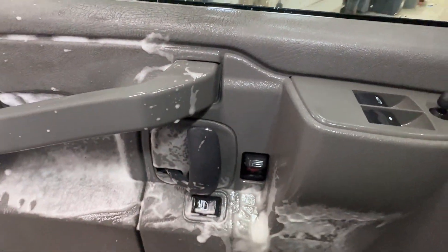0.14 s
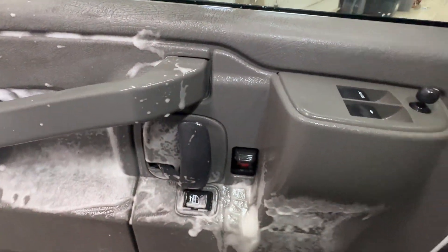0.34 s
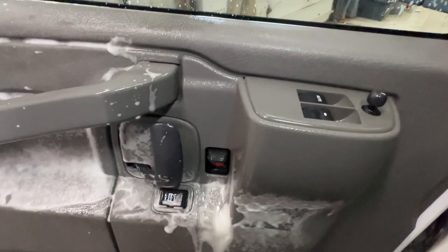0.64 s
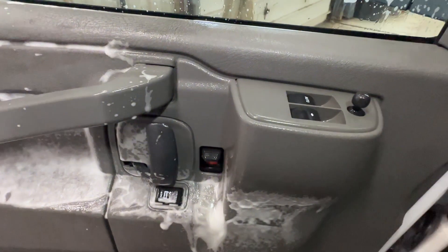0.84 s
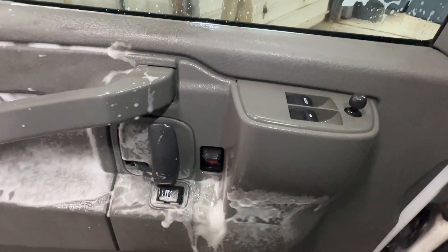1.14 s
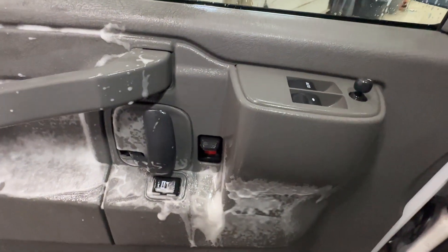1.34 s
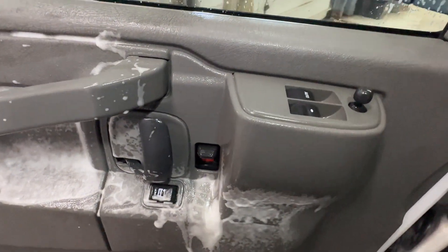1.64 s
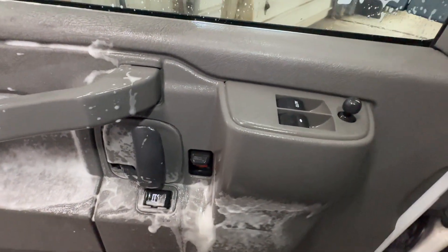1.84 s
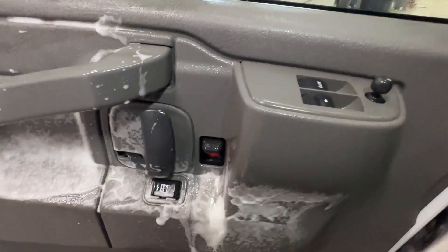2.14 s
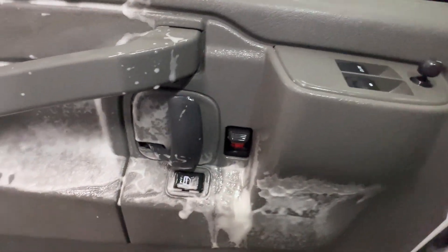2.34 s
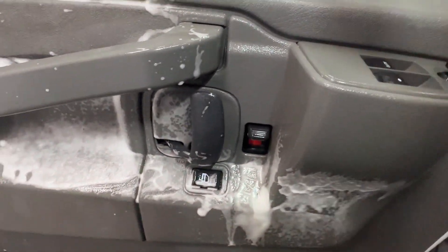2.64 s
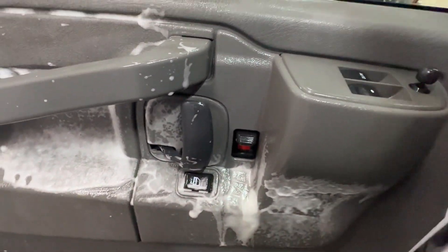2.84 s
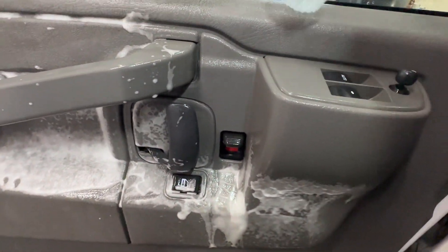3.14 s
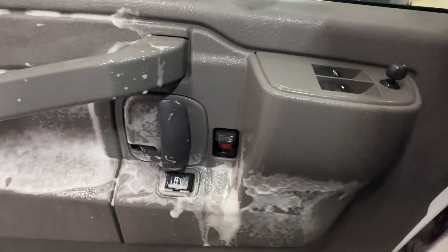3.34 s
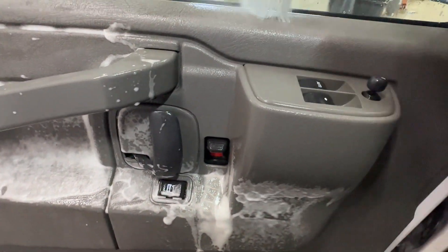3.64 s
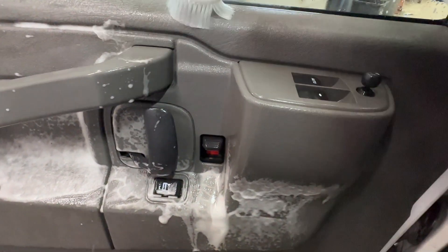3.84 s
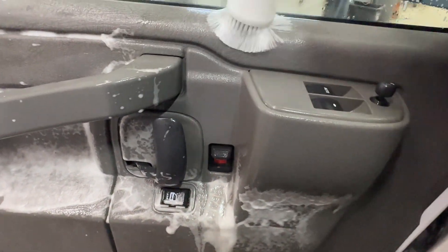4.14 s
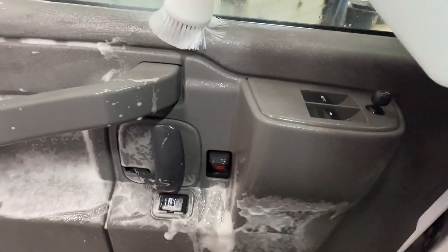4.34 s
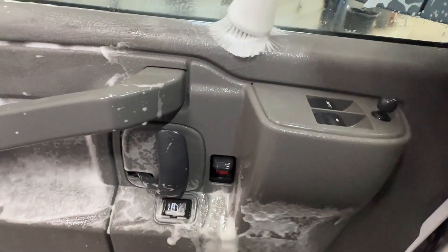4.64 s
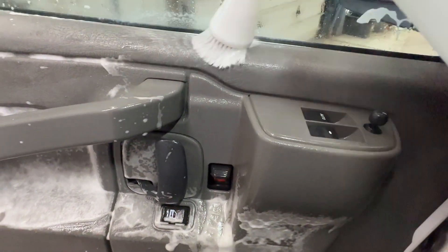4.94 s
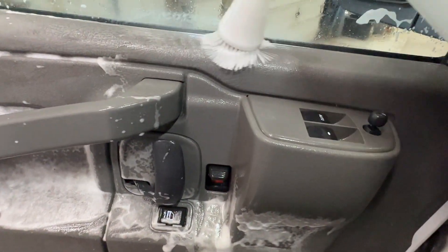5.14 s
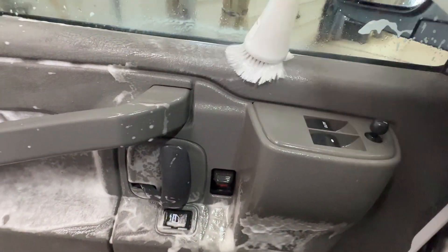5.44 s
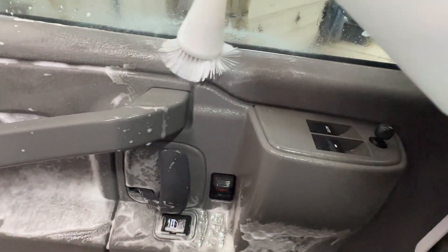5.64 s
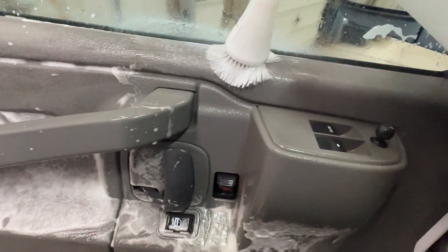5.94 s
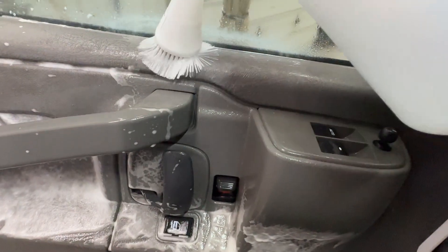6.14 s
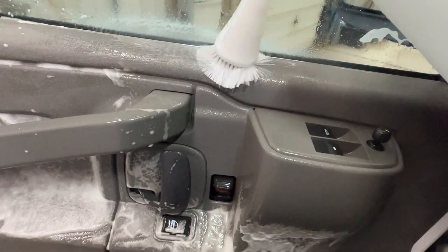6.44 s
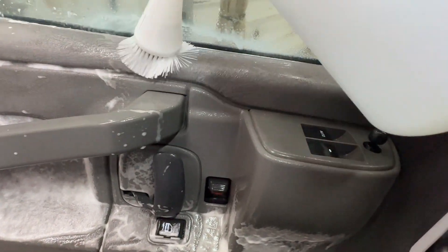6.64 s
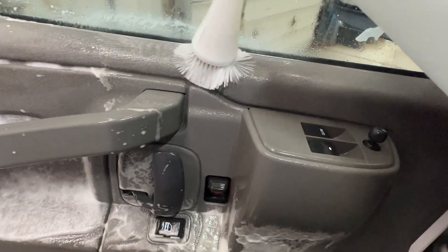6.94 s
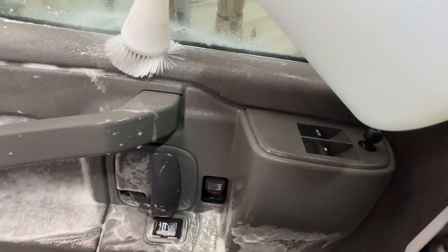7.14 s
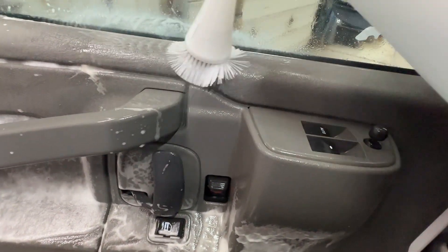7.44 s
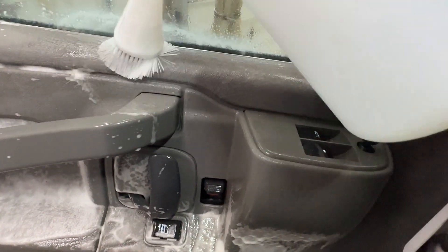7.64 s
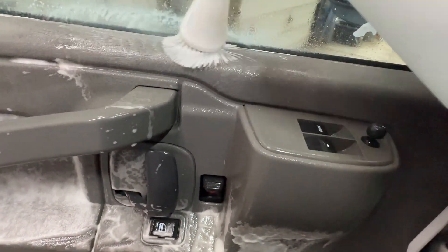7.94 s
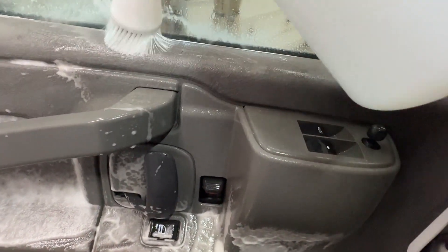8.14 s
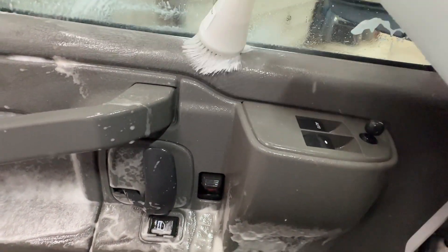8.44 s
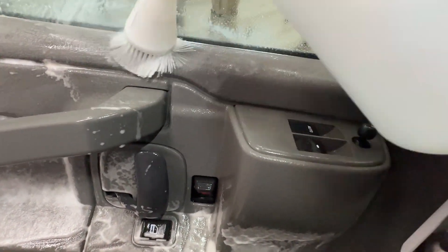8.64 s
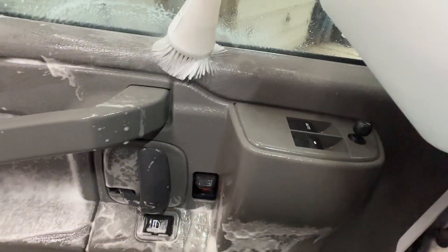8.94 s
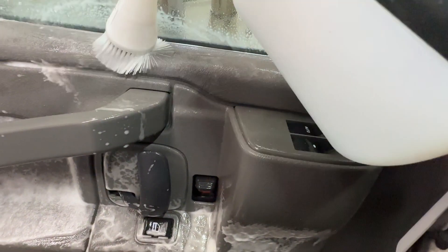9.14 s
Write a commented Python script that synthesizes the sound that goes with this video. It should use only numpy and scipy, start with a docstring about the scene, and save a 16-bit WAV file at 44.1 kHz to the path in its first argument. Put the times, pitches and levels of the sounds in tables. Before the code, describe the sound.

Close steam hiss with gliding hollow tones and small knocks, windy gusts and a thump, then a fast, buzzing, wet spray through bristles on plastic.

```python
"""A steam cleaner hisses inside an open car door, close to a two-port microphone: filtered noise in three
parts (roar, rush and hiss), with hollow rings that glide and fade. A low draught and a few knocks join in.
The free jet swings nearer, gusts of noise and a thump buffet the microphone, and the level dips briefly.
Then the round brush meets the wet plastic panel and scrubs to and fro: the noise sputters
about 62 times a second through the bristles, with ticking droplets and a faint hum."""
import sys
import numpy as np
from scipy import signal
from scipy.fft import rfft, irfft
from scipy.io import wavfile
from scipy.ndimage import uniform_filter1d, map_coordinates

SR = 44100
rng = np.random.default_rng(int(sys.argv[2]) if len(sys.argv) > 2 else 0)


def dump(signal):
    """Clip the signal to [-1, 1] and save it as 16-bit WAV at the path in sys.argv[1]."""
    limited = np.clip(np.atleast_2d(signal).T, -1, 1)
    pcm = np.round(limited * 32767).astype(np.int16)
    wavfile.write(sys.argv[1], SR, pcm)


N = 409248
T = np.arange(N) / SR  # time of each sample, s
HZ = np.fft.rfftfreq(N, 1 / SR)
SWITCH_S = 3.309  # the brush meets the panel


def gain_of(db):
    """Turns decibels into a gain."""
    return 10 ** (np.asarray(db) / 20)


def evened(x):
    """Scales to rms 1."""
    return x / np.sqrt(np.mean(x ** 2) + 1e-20)


def read(points, hz):
    """Reads a curve over frequency, with straight lines on a log-frequency axis."""
    f, value = np.transpose(points)
    return np.interp(np.log(hz + 1), np.log(f), value)


def follow(rows):
    """Gives each column of a curve over time at every sample."""
    s, *columns = np.transpose(rows)
    return [np.interp(T, s, column) for column in columns]


def shaped(x, gain):
    """Filters by a gain for each frequency."""
    return irfft(rfft(x) * gain, N)


def band_rms(x, lo, hi):
    """Measures the level of a sound within a band."""
    return shaped(x, (HZ > lo) & (HZ < hi)).std()


def waver(rate_hz):
    """Random wandering of rms 1, mostly slower than the given rate."""
    return evened(shaped(rng.standard_normal(N), 1 / (1 + (HZ / rate_hz) ** 2)))


def gate(start, end, edge_s):
    """1 between two moments, with sloping edges."""
    return np.clip(np.minimum(T - start, end - T) / edge_s + .5, 0, 1)


def pair(same, phase):
    """White turbulence at two ports: partly the same noise, with the left port ahead by a phase."""
    a, b = rfft(rng.standard_normal((2, N)))
    same = np.clip(same, 0, 1)
    right = (same * a + np.sqrt(1 - same ** 2) * b) * np.exp(-1j * phase)
    return irfft(np.array([a, right]), N)


def echoed(x, lag_ms, strength, dull_hz=6000):
    """A near surface throws back a dull, inverted copy, which combs the sound as the lag changes."""
    late = T - lag_ms / 1000
    dull = shaped(x, 1 / (1 + (HZ / dull_hz) ** 4))
    return x - strength * np.array([np.interp(late, T, side) for side in dull])


def lagged(x, lag_ms):
    """Delays a sound by a changing amount."""
    return map_coordinates(x, [(T - lag_ms / 1000) * SR], order=3, mode="nearest")


def swept(x, lag_ms):
    """As the source moves sideways, it reaches the left port later or sooner."""
    return np.array([lagged(x[0], lag_ms), x[1]])


def patches(shape, size=(7, 12)):
    """Random patches of rms 1 that swell and fade, smoothed over size (bins, frames)."""
    across_bins = uniform_filter1d(rng.standard_normal(shape), size[0], axis=-2)
    return evened(uniform_filter1d(across_bins, size[1], axis=-1))


# strength at which each jet's parts have their listed levels
USUAL_DB = -20


def part_levels(strength_db, parts):
    """Roar, rush and hiss each follow the jet's strength by their own amount."""
    return [db + slope * (strength_db - USUAL_DB) for db, slope in parts]


# the microphone housing sets the lead of the left port in the treble: f/Hz, phase/rad
HOUSING_PHASE = [(7700, 0), (8400, -1.8), (9100, -3.0), (9650, -3.1), (10400, 0), (11800, 0), (12250, .8),
                 (12600, 3), (13700, 3.1), (14100, .3), (14500, 0)]
# balance of the jets between the ports: f/Hz, left minus right level/dB
BALANCE_DB = [(300, -2.5), (700, -1), (1300, -3.5), (2400, .5), (4400, 0.5), (8100, -2), (11000, 0.5)]
# likeness of the two ports; the rest is scatter: f/Hz, share 0-1
LIKENESS = [(60, .92), (520, .88), (750, .68), (1500, .72), (2200, .4), (3400, .22), (4500, .26),
            (5900, .18), (7000, .3), (8300, .7), (9300, .96), (10000, .72), (10700, .96), (12300, .82),
            (13000, .98), (15000, .96)]
DIRECT_LIKENESS = 0.98


def steam(colour, phase, peaks, direct_patchy_db, scatter_patchy_db, aimed):
    """Jet noise as roar, rush and hiss, each of level 1: ringing direct sound plus scatter off the door."""
    lead = np.where(HZ < HOUSING_PHASE[0][0], read(phase, HZ), read(HOUSING_PHASE, HZ))
    half_balance = np.array([[.5], [-.5]]) * read(BALANCE_DB, HZ)
    tint = gain_of(read(colour, HZ) + half_balance)
    sources = shaped(np.array([pair(DIRECT_LIKENESS, lead), pair(0, 0)]), tint)
    hz, t, (direct, scatter) = signal.stft(sources, SR, nperseg=1024)
    ring_db = 0
    for centre, width, db in peaks:
        offset = 2 * (hz[:, None] - np.interp(t, T, centre)) / width
        ring_db = ring_db + np.interp(t, T, db) / (1 + offset ** 2)
    # the straighter the aim, the less scatter
    scattered = (1 - read(LIKENESS, hz)[:, None]) * np.clip(1 - np.interp(t, T, aimed), 0, 1)
    direct = direct * np.sqrt(1 - scattered) * gain_of(ring_db + direct_patchy_db * patches(ring_db.shape))
    scatter = scatter * np.sqrt(scattered) * gain_of(scatter_patchy_db * patches(scatter.shape))
    noise = signal.istft(direct + scatter, nperseg=1024)[1][:, :N]
    bands = [(700, 1800), (1800, 7500), (7500, 16000)]  # where each part's level is set, Hz
    low, high = (1 / (1 + (HZ / split_hz) ** 8) for split_hz in bands[1])
    shares = [low, high - low, 1 - high]
    return [shaped(noise, share) / band_rms(noise, *band) for share, band in zip(shares, bands)]


# hollow rings and breathy whistles that come and go as the wand moves:
# start t/s, end t/s, from f/Hz, to f/Hz, level/dB
RINGS = [(-0.1, 1.05, 2490, 2330, 6.5), (-0.1, 1.2, 5170, 5540, 10), (0.55, 1.1, 3220, 3120, 7),
         (0.55, 1.25, 6300, 6280, 6), (1.35, 2.06, 2920, 2960, 7), (1.36, 1.72, 3680, 3600, 2),
         (1.4, 2.05, 6150, 6480, 8), (1.4, 1.8, 5600, 5500, 7), (1.55, 1.85, 2200, 2200, 4.5),
         (1.75, 2.4, 680, 600, 5), (2.18, 2.548, 3080, 2600, 6.5), (2.25, 2.7, 6070, 5950, 4.5),
         (2.44, 2.9, 5450, 4950, 3), (2.55, 2.93, 980, 880, 4), (2.58, 2.932, 2450, 2230, 6.5),
         (3.12, 3.32, 2900, 3200, 2), (4.3, 4.48, 5015, 4950, 8), (4.93, 5.25, 3045, 3000, 2),
         (7.7, 7.896, 5120, 5100, -1), (7.8, 8.45, 2600, 2650, 3), (8.86, 9.05, 5200, 5190, 0)]
RING_WIDTH_HZ, RING_EDGE_S = 370, 0.17


def rings():
    """Each ring glides and fades in and out: (Hz curve, width, dB curve)."""
    curves = []
    for start, end, from_hz, to_hz, db in RINGS:
        glide = np.interp(T, [start, end], [from_hz, to_hz])
        curves.append((glide, RING_WIDTH_HZ, db * gate(start, end, RING_EDGE_S)))
    return curves


# DIP_DB is the depth before the recovery eats into it
DIP_S, DIP_FALL_S, DIP_DB, DIP_RECOVERY_DB_PER_S = 3.1, 0.029, -16.5, 33


def dip():
    """The level falls quickly between the gusts and creeps back, in dB."""
    age = np.maximum(T - DIP_S, 0)
    return np.minimum(age / DIP_FALL_S, 1) * np.minimum(DIP_DB + DIP_RECOVERY_DB_PER_S * age, 0)


# tone of the free jet: f/Hz, relative level/dB per Hz
OPEN_COLOUR = [(200, -17), (350, -13.5), (490, -15), (640, -10), (850, -9.5), (1100, -7.5), (1800, -5),
               (2400, -4), (3500, -2), (5600, 1.5), (6600, 1), (7900, -2), (9200, -1.5), (10600, -7.5),
               (12300, -7.5), (15300, -1.5)]
# lead of the left port: f/Hz, phase/rad
OPEN_PHASE = [(100, -1), (400, -1.2), (800, -1.68), (1200, -2.5), (1680, -3), (2000, -4.5), (2400, -6.5),
              (3000, -7.5), (3300, -8.5), (3650, -9.5), (4400, -11), (4900, -14), (5450, -15), (6200, -19),
              (7000, -21), (7700, -28)]
# strength as the wand swings about and comes nearer: t/s, level/dB
SWING = [(0.0, -25), (0.16, -24.5), (0.48, -21), (0.88, -20.5), (1.28, -23), (1.4, -18.5), (1.52, -20.5),
         (1.68, -16.5), (1.84, -21), (1.96, -16.5), (2.08, -21), (2.8, -13.5), (2.95, -13.5)]
# roar, rush and hiss, one row each: level/dB at the usual strength, dB gained per dB of strength
OPEN_PARTS = [(-35, 0.84), (-24.5, 1.0), (-24.5, 0.6)]
# how straight the jet points at the microphone: t/s, share 0-1
AIM = [(0, 0.07), (1.3, 0.3), (1.55, 0.28), (2.1, 0.17), (2.36, 0.35), (2.43, 0.77), (2.65, 0.64),
       (2.86, 0.7), (2.96, 0), (3.2, .1)]
# the wand sweeps across the ports: t/s, extra lag of the left port/ms
SWEEP = [(0, -0.0033), (1.15, 0.0012), (1.55, -0.0018), (2.05, -0.053), (2.33, 0.014), (2.45, 0.006),
         (2.62, 0.015), (2.85, 0.055), (3.15, 0.036)]
# the jet roars more as it turns towards the microphone
TURN_S, TURN_LENGTH_S, TURN_ROAR_DB = 2.46, 0.58, 3.5
# a gust adds roar and covers rush and hiss
GUST_ROAR_DB, GUST_RUSH_DB, GUST_HISS_DB = 5, -1.5, -5
DIP_ROAR_SHARE, DIP_HISS_SHARE = 0.93, 0.94
DOOR_ECHO_MS, DOOR_ECHO_STRENGTH = 0.6, 0.12  # strength when aimed straight


def open_jet(hiss_rise_db_per_s=0.25, flutter_db=0.72, roar_flutter_db=-0.35, gust_edge_s=0.02):
    """Smooth hiss with breathy, shifting rings; its echo and its sweep across the ports make it phasey."""
    roar_db, rush_db, hiss_db = part_levels(follow(SWING)[0], OPEN_PARTS)
    facing = np.clip((T - TURN_S) / TURN_LENGTH_S, 0, 1)
    blown = gate(GUSTS[0][0], GUSTS[1][1], gust_edge_s)  # spans the first two gusts
    roar_db = roar_db + TURN_ROAR_DB * facing + GUST_ROAR_DB * blown
    roar_db = roar_db + roar_flutter_db * waver(50) + DIP_ROAR_SHARE * dip()
    rush_db = rush_db + GUST_RUSH_DB * blown + dip()
    hiss_db = hiss_db + hiss_rise_db_per_s * T + GUST_HISS_DB * blown + DIP_HISS_SHARE * dip()
    aimed, = follow(AIM)
    roar, rush, hiss = steam(OPEN_COLOUR, OPEN_PHASE, rings(), direct_patchy_db=2.8,
                             scatter_patchy_db=2.5, aimed=aimed)
    body = gain_of(rush_db) * rush + gain_of(roar_db) * roar
    body = echoed(body, DOOR_ECHO_MS, DOOR_ECHO_STRENGTH * aimed)
    body = swept(body, follow(SWEEP)[0])
    return (body + gain_of(hiss_db) * hiss) * gain_of(flutter_db * waver(33))


# tone of the air stirred by the free jet: f/Hz, relative level/dB per Hz
BREEZE_COLOUR = [(15, -9), (38, -1.5), (75, 3), (130, -3.5), (260, -6.5), (450, -18), (900, -23)]
# tone of the draught shed by the bristles: f/Hz, relative level/dB per Hz
WAKE_COLOUR = [(15, -30), (35, -3.5), (80, 3.5), (130, 0), (200, -1), (330, -2.5), (480, -8.5), (800, -60)]
BREEZE_DB, DIP_BREEZE_SHARE = -39, 0.83
WAKE_DB, WAKE_FALL_DB_PER_S, WAKE_REST_DB = -30.5, 8.5, -55
# the wake stops reaching the microphone, down to its rest level
WAKE_END_S, WAKE_END_LENGTH_S = 5.77, 0.49


def draught(on_panel, lumps_db=2.0, lean_db=5):
    """Low lumpy air stirred by the jet, then a bristle wake that leans to the right port and dies away."""
    breeze = shaped(pair(0.92, 0), gain_of(read(BREEZE_COLOUR, HZ)))
    wake = shaped(pair(0.81, 1.0), gain_of(read(WAKE_COLOUR, HZ)))
    band = (30, 450)  # where both levels are set, Hz
    fall_db = WAKE_FALL_DB_PER_S * np.maximum(T - SWITCH_S, 0)
    dying = gain_of(WAKE_DB - fall_db + np.array([[-.5], [.5]]) * lean_db)
    dying = dying * gate(0, WAKE_END_S, WAKE_END_LENGTH_S)
    breeze = breeze / band_rms(breeze, *band) * gain_of(BREEZE_DB + DIP_BREEZE_SHARE * dip())
    wake = wake / band_rms(wake, *band) * np.hypot(dying, gain_of(WAKE_REST_DB))
    return ((1 - on_panel) * breeze + on_panel * wake) * gain_of(lumps_db * waver(8.9))


# knocks of the handled wand: t/s, level/dB, ring f/Hz, time to fade by 60 dB/s, tick level/dB re the ring
KNOCKS = [(1.662, -35, 240, 0.067, -24), (1.922, -22.5, 250, 0.11, -26), (1.959, -21, 233, 0.062, -20),
          (2.041, -19.5, 1057, 0.056, -3), (2.133, -29, 220, 0.08, -24), (2.385, -31, 212, 0.12, -24)]


def knocks(tick_hz=3600, tick_width=2200, tick_t60=0.06, overtone=1.88, overtone_db=-8):
    """Each knock is a short plastic ring with one overtone and a bright crack."""
    out = np.zeros((2, N))
    crack = evened(shaped(pair(.5, 0), 1 / (1 + (2 * (HZ - tick_hz) / tick_width) ** 2)))
    for s, db, hz, t60, tick_db in KNOCKS:
        t = np.maximum(T - s, 0)
        # the overtone is opposite at the two ports
        upper = gain_of(overtone_db) * np.array([[1], [-1]]) * np.sin(2 * np.pi * overtone * hz * t)
        ring = (np.sin(2 * np.pi * hz * t) + upper) * np.exp(-np.log(1000) * t / t60)
        tick = crack * (t > 0) * np.exp(-np.log(1000) * t / tick_t60)
        out += gain_of(db) * (ring + gain_of(tick_db) * tick)
    return out


# the jet blows straight on the microphone: start t/s, end t/s, level/dB
GUSTS = [(2.928, 2.971, -19.5), (2.977, 3.103, -18.5), (3.325, 3.375, -20), (3.379, 3.435, -16.5)]
# tone of the buffeting: f/Hz, relative level/dB per Hz
GUST_COLOUR = [(15, -26), (30, -24), (65, 0.5), (150, 1), (320, 2), (480, -10.5), (620, -25), (1200, -7),
               (2000, -25), (3500, -56)]


def gusts(edge_s=0.0088, lean_db=15, lean_hz=700, lumps_db=2.5, turn_hz=260):
    """Turbulence right at the ports; its bass hits the right one harder."""
    phase = -np.pi * np.exp(-np.log((HZ + 1) / turn_hz) ** 2) * .7
    air = shaped(pair(0.9, phase), gain_of(read(GUST_COLOUR, HZ)))
    air = shaped(air, gain_of(np.array([[-1], [0]]) * lean_db / (1 + (HZ / lean_hz) ** 2)))
    blast = sum(gain_of(db) * gate(start, end, edge_s) for start, end, db in GUSTS)
    # the strongest eddies are squashed at the ports
    squashed = np.tanh(evened(air) * gain_of(lumps_db * waver(46)) / 2)
    return evened(squashed) * blast


def thump(start_s=3.097, length_s=0.048, from_hz=245, to_hz=30, level_db=-15):
    """The first pair of gusts ends in a short falling thump, weaker at the left port."""
    age = np.clip((T - start_s) / length_s, 0, 1)
    turns = np.cumsum(from_hz * (to_hz / from_hz) ** age) / SR
    swell = np.sin(np.pi * age) * (1 - age) * 2
    return gain_of(level_db + np.array([[-7], [0]])) * swell * np.sin(2 * np.pi * turns)


def throb(turns, depth_db, second=0.18, third=0.44):
    """Gain over one spurt of steam: a sharp crest and a longer trough, rms 1 overall."""
    angle = 2 * np.pi * turns
    wave = np.cos(angle) + second * np.cos(2 * angle) + third * np.cos(3 * angle)
    return evened(gain_of(depth_db * wave))


# tone of the steam through the brush: f/Hz, relative level/dB per Hz
BRUSH_COLOUR = [(30, -45), (90, -18), (200, -18.5), (490, -21), (640, -7.5), (850, -7.5), (1100, -6.5),
                (1400, -5.5), (1900, -2), (2800, -0.8), (3900, 0.4), (4800, 0.8), (6900, 0.9), (8200, 3),
                (9300, 3), (10600, -3), (12200, -3.5), (13300, 0), (15000, 0.3)]
# lead of the left port: f/Hz, phase/rad
BRUSH_PHASE = [(60, -3), (300, -3), (530, -3.2), (720, -4), (1200, -5.5), (1950, -5), (2300, -6),
               (3000, -8.5), (3600, -8), (4300, -12), (5050, -15.5), (5900, -19), (6700, -21),
               (7700, -25.5)]
# roar, rush and hiss, one row each: level/dB at the usual strength, dB gained per dB of strength
BRUSH_PARTS = [(-36.5, 0.23), (-24, 0.88), (-23.5, 0.023)]
# hollow between brush cup and panel: f/Hz, width/Hz, level/dB at full seal
CUP = [(1080, 310, 8), (2350, 140, 8), (3390, 650, 15.5), (5810, 1100, 12)]
# how well the cup seals on the panel: t/s, share 0-1
SEAL = [(3.3, 0.22), (3.55, 0.23), (4.15, 0.7), (4.7, 0.66), (5.04, 0.84), (5.3, 0.57), (6.3, 0.7),
        (7.0, 0.67), (7.65, 0.75), (7.92, 0.92), (8.3, 0.65), (8.55, 0.45), (8.9, 0.63)]
# wet steam sputters in the brush: t/s, spurt rate f/Hz, depth as a factor
SPUTTER = [(3.3, 63.15, 1.1), (3.8, 63.72, 1.7), (4.3, 63.32, 1.6), (5.1, 62.9, 1.4), (6.0, 62.7, 1.3),
           (7.0, 61.33, 1.29), (7.8, 61.5, 1.56), (8.3, 63.3, 0.96), (8.7, 62.4, 1.4), (9.2, 61.55, 1.63)]
# extra roar dies away as the brush beds in; BED_S is the time to fall to 37 % of the extra dB
BED_ROAR_DB, BED_S = 14, 1.25
GLASS_ECHO_MS, GLASS_SWING_MS, GLASS_ECHO_STRENGTH = 0.99, 0.13, 0.18
STROKE_LAG_MS = 0.014


def brush_jet(turns, escape_db, roar_lag=0.25, wander=0.032, rocking=0.16):
    """Steam spurts unevenly through the bristles and rings the rocking cup; the roar trails each spurt."""
    roar_db, rush_db, hiss_db = part_levels(escape_db, BRUSH_PARTS)
    roar_db = roar_db + BED_ROAR_DB * np.exp(-np.maximum(T - SWITCH_S, 0) / BED_S)
    seal, = follow(SEAL)
    cup = [(hz * (1 + wander * waver(1.9)), width, db * seal * (1 + rocking * waver(7.2)))
           for hz, width, db in CUP]
    roar, rush, hiss = steam(BRUSH_COLOUR, BRUSH_PHASE, cup + rings(), direct_patchy_db=1.7,
                             scatter_patchy_db=2.0, aimed=np.zeros(N))
    strength = follow(SPUTTER)[1] * (1 + 0.25 * waver(31))
    uneven = waver(49)
    roar = roar * throb(turns - roar_lag, depth_db=2.0 * strength) * gain_of(roar_db + 1.3 * waver(40))
    # the larger eddies of the rush feel each spurt more than the fine ones
    coarse = shaped(rush, 1 / (1 + (HZ / 4000) ** 6))
    fine = rush - coarse
    rush = coarse * throb(turns, depth_db=1.96 * strength) + fine * throb(turns, depth_db=0.7 * strength)
    # the strokes change the gap to the window glass and carry the brush across the ports
    stroke = waver(8.5)
    rush = echoed(rush, GLASS_ECHO_MS + GLASS_SWING_MS * stroke, GLASS_ECHO_STRENGTH)
    rush = swept(rush, STROKE_LAG_MS * stroke) * gain_of(rush_db + .5 * uneven)
    hiss = hiss * throb(turns, depth_db=1.28 * strength) * gain_of(hiss_db + .5 * uneven)
    return roar + rush + hiss


def spits(escape_db, per_s=260, level_db=-17.5, spread_db=4, cycles=3, count=20):
    """Droplets and flicking bristles tick on the wet panel, more strongly with more rush."""
    t, out = T[:512], np.zeros((2, N))
    for hz in np.geomspace(1100, 9000, count):
        happens = rng.random(N) < per_s / count / SR
        hits = happens * gain_of(spread_db * np.minimum(rng.exponential(1, N), 4))
        tick = np.exp(-t * hz / cycles) * np.sin(2 * np.pi * (hz * t + rng.random((2, 1))))
        out += signal.oaconvolve(hits[None], tick / np.linalg.norm(tick), axes=1)[:, :N]
    out = shaped(out, 1 - 1 / (1 + (HZ / 900) ** 8))  # too small to radiate bass
    return evened(out) * gain_of(level_db + escape_db)


# hum at 1 to 4 times the spurt rate, one value each, before swelling: level/dB
HUM_DB = [-71.5, -66, -66.5, -75]
# rise and fall of the whole hum: t/s, level/dB
HUM_SWELL = [(5.5, -1), (6.6, -1), (7.15, 0), (7.8, -4), (8.12, 6), (8.4, 0), (9.1, 3)]


def hum(turns, swell_db=4.5, swell_hz=4):
    """The spurts shake the wand: faint low tones that swell and fade."""
    tones = 0
    for order, db in enumerate(HUM_DB, start=1):
        swell = gain_of(db + swell_db * waver(swell_hz))
        tones = tones + swell * np.sqrt(2) * np.sin(2 * np.pi * order * turns)
    return tones * gain_of(follow(HUM_SWELL)[0])


# strength of the steam that escapes past the bristles: t/s, level/dB
ESCAPE = [(3.32, -15), (3.62, -13), (3.71, -19), (3.8, -16.5), (4.16, -23.5), (4.7, -20.5), (4.88, -24),
          (5.06, -20), (5.15, -22.5), (7.49, -23), (8.03, -22), (8.21, -19.5), (8.57, -21), (9.27, -22)]
# uneven strokes to and fro open and close the bristles
STROKES_HZ, STROKE_DB = 8, -0.24


def scene():
    """The open jet gives way to the sputtering brush."""
    turns = np.cumsum(follow(SPUTTER)[0] + 0.57 * waver(6.53)) / SR  # spurts so far
    on_panel = np.clip((T - SWITCH_S) / 0.014 + .5, 0, 1)
    escape_db = follow(ESCAPE)[0] + STROKE_DB * waver(STROKES_HZ)
    jet = (1 - on_panel) * open_jet()
    scrubbing = on_panel * (brush_jet(turns, escape_db) + spits(escape_db) + hum(turns))
    return jet + draught(on_panel) + knocks() + gusts() + thump() + scrubbing


def record(dry, low_cut_hz=26, edge_hz=15850):
    """The microphone's low cut and the recorder's band limit."""
    dry = shaped(dry, 1 - 1 / (1 + (HZ / low_cut_hz) ** 4))
    band_limit = signal.firwin(1023, edge_hz, window=("kaiser", 9), fs=SR)
    return signal.oaconvolve(dry, band_limit[None], "same")


dry = scene()
out = record(dry)
dump(out)
```